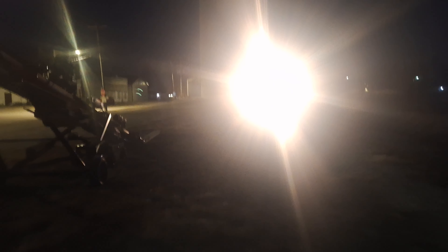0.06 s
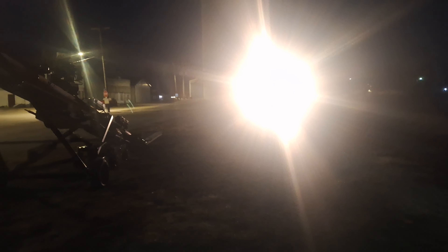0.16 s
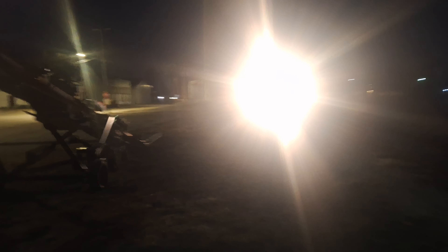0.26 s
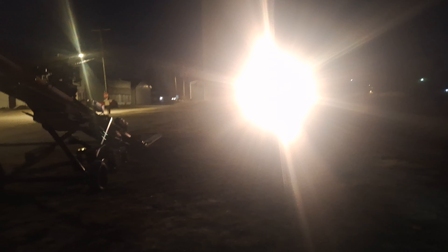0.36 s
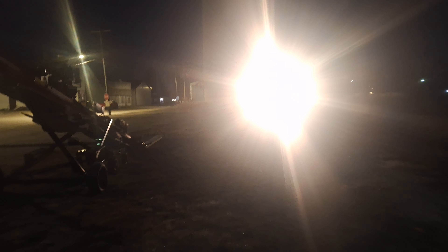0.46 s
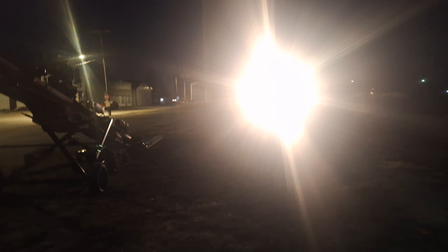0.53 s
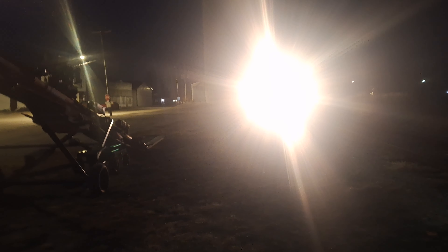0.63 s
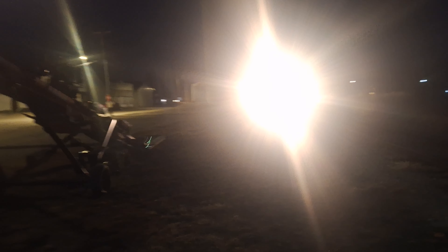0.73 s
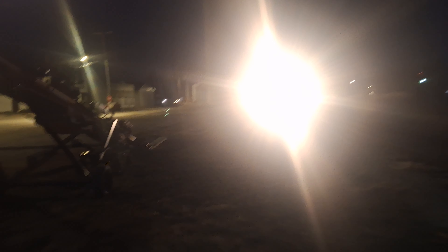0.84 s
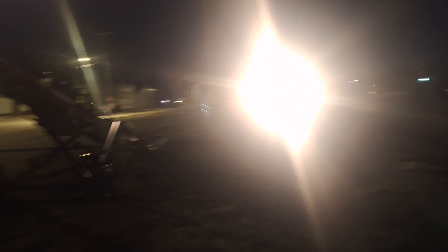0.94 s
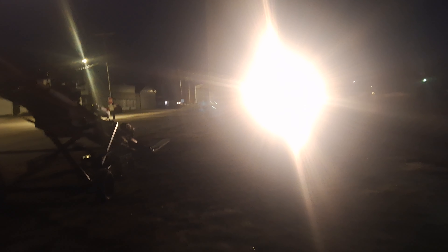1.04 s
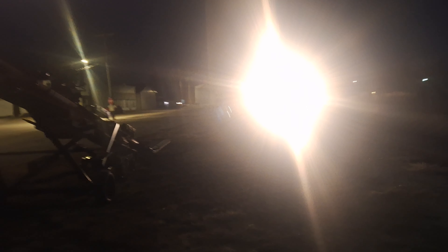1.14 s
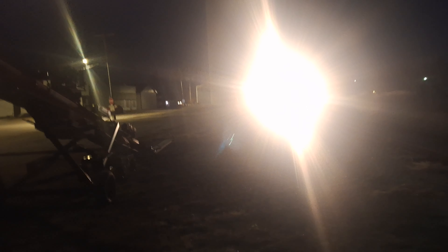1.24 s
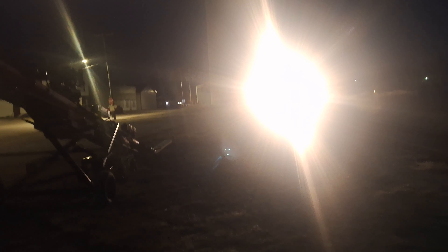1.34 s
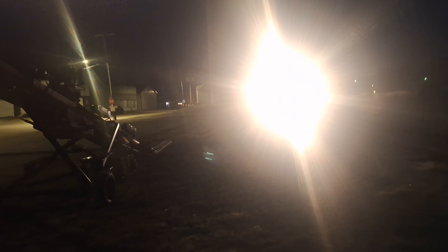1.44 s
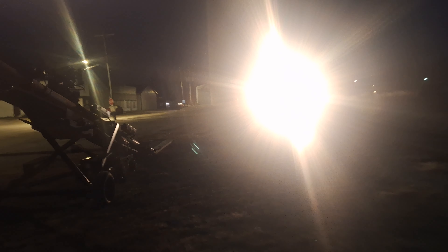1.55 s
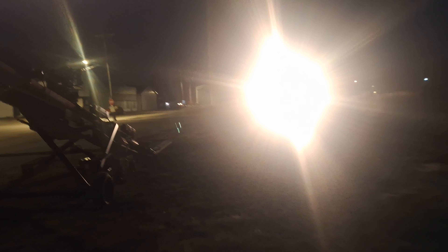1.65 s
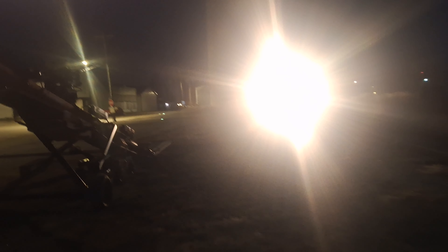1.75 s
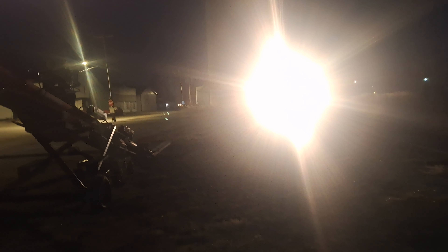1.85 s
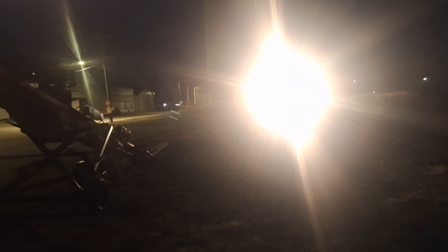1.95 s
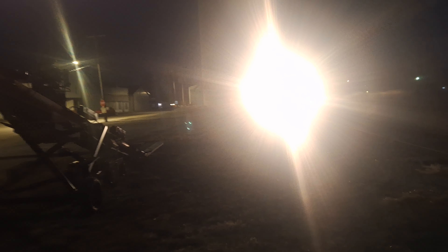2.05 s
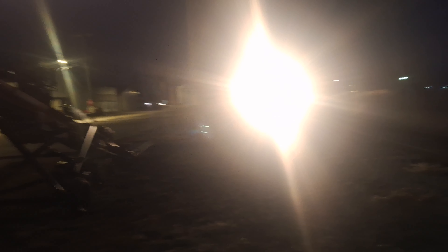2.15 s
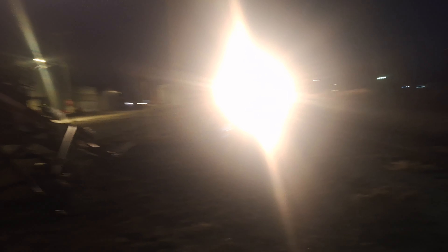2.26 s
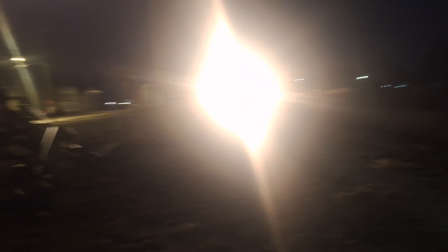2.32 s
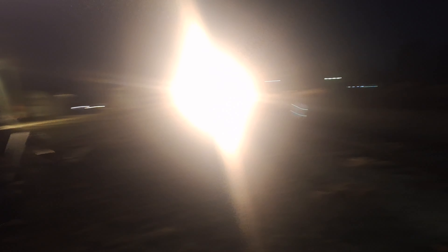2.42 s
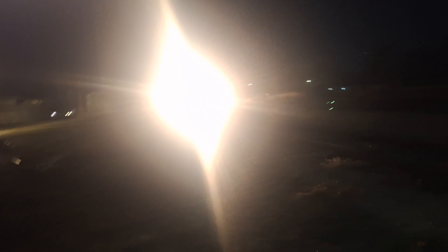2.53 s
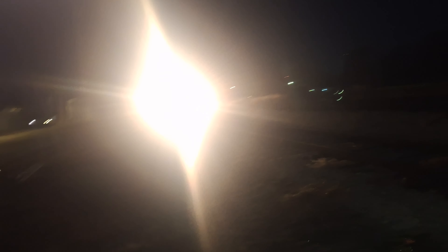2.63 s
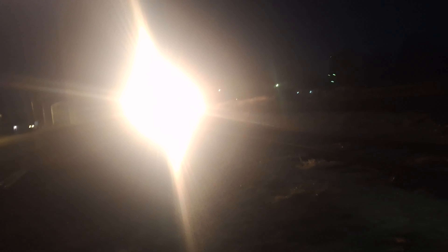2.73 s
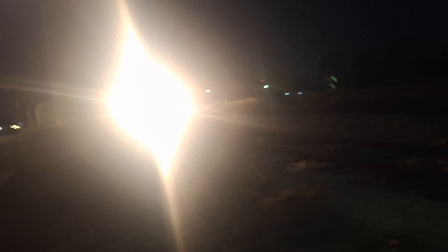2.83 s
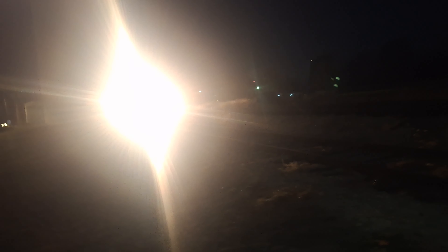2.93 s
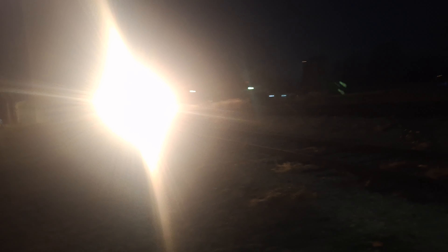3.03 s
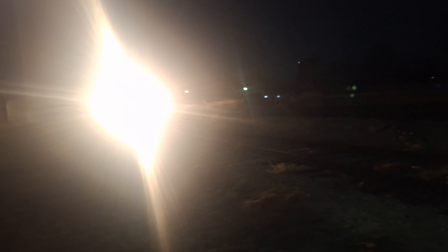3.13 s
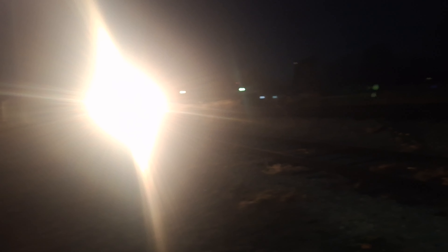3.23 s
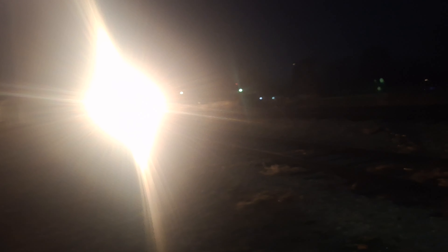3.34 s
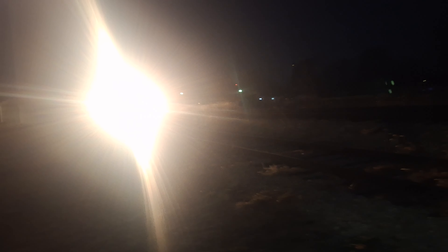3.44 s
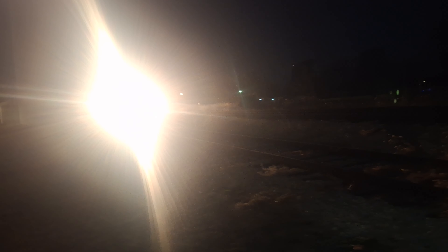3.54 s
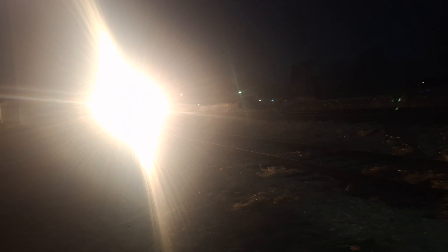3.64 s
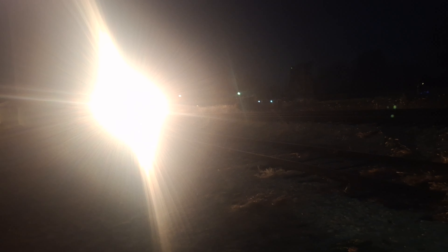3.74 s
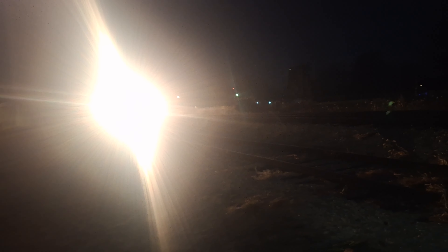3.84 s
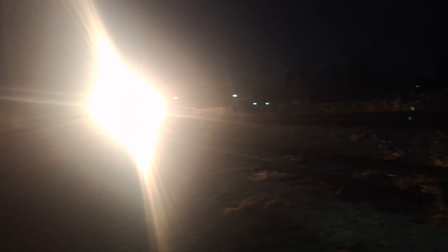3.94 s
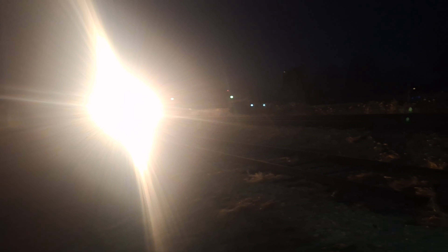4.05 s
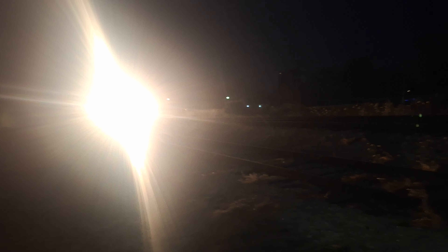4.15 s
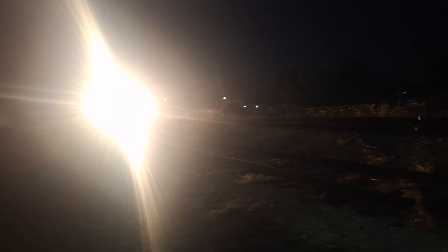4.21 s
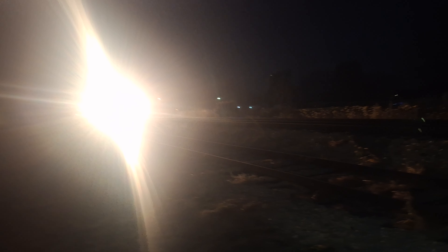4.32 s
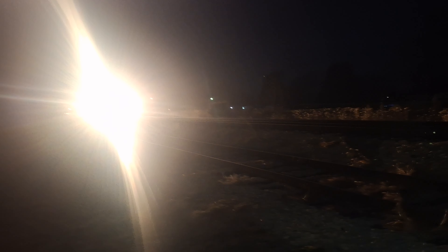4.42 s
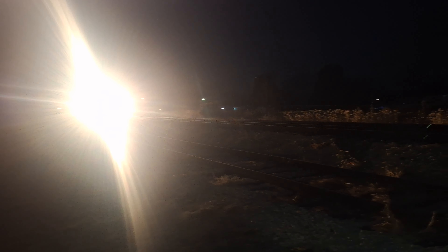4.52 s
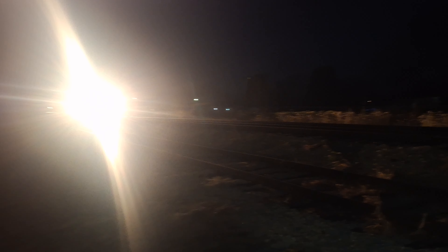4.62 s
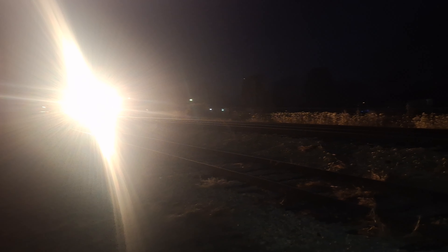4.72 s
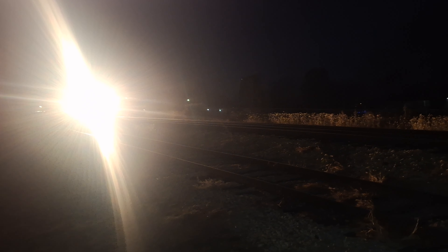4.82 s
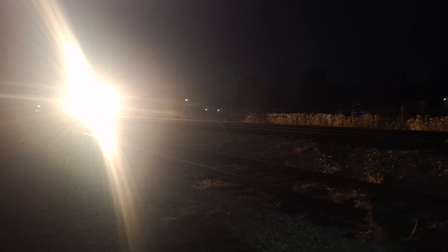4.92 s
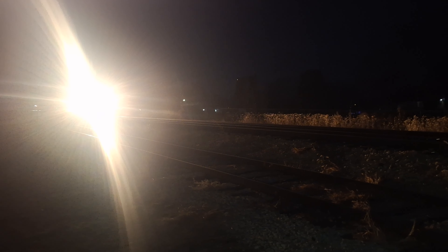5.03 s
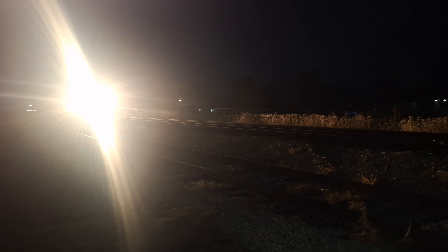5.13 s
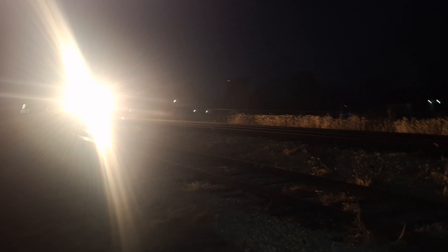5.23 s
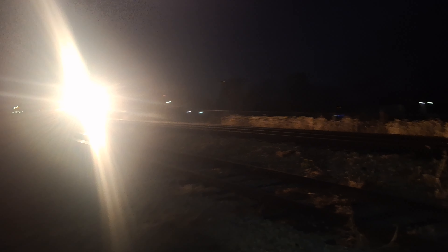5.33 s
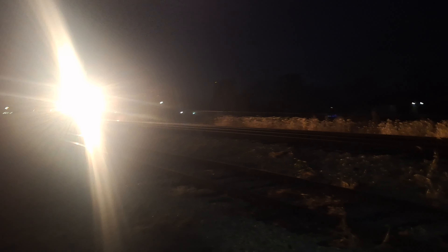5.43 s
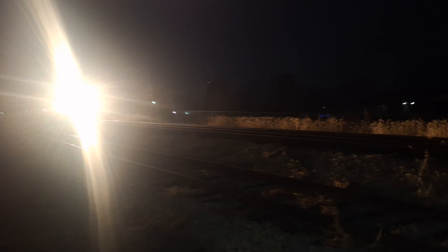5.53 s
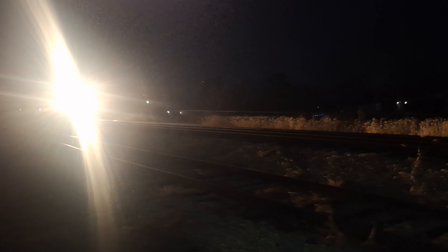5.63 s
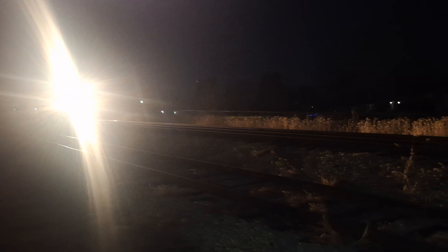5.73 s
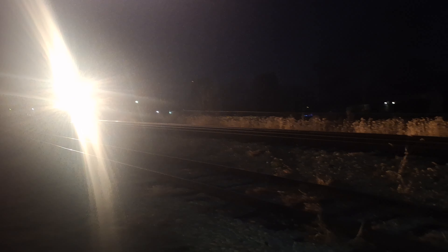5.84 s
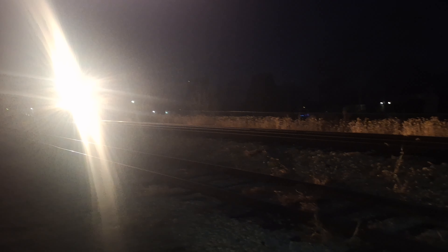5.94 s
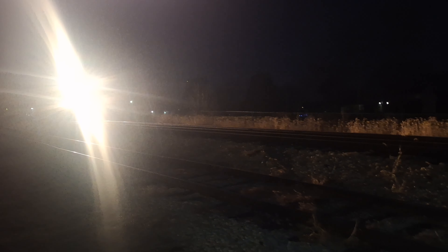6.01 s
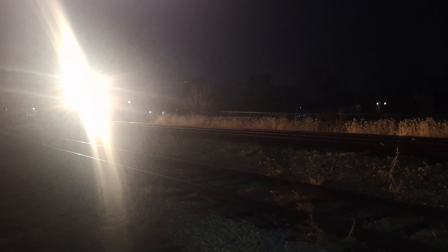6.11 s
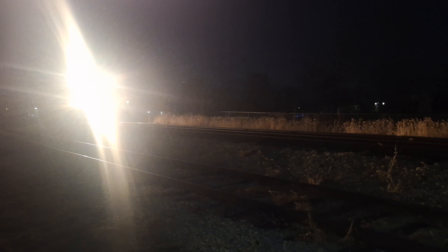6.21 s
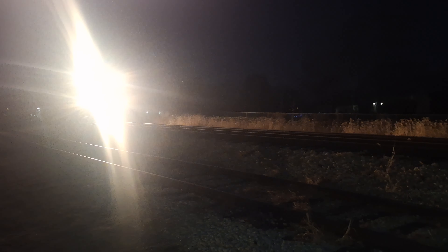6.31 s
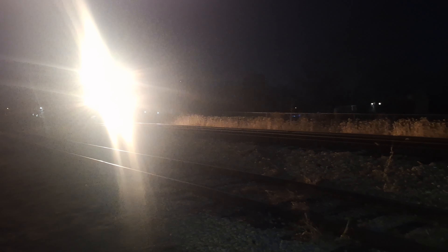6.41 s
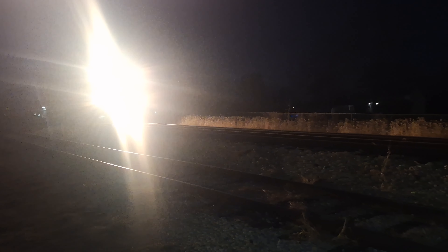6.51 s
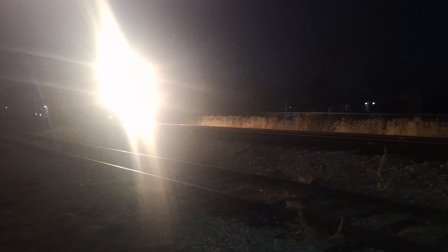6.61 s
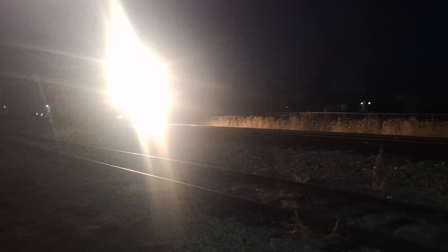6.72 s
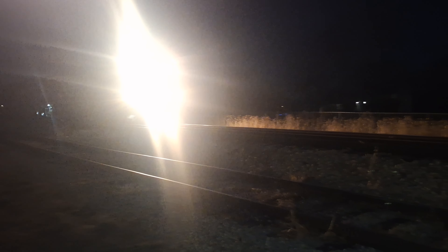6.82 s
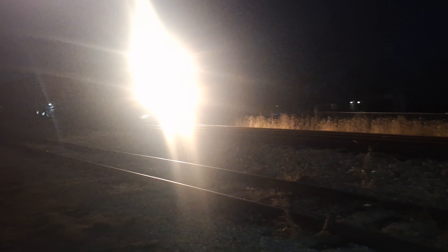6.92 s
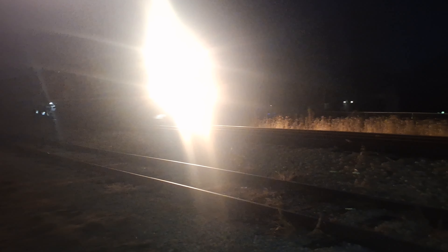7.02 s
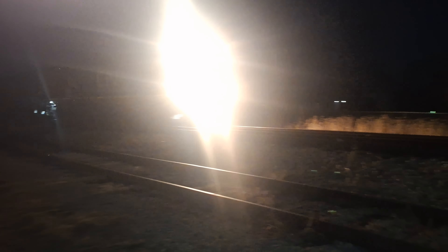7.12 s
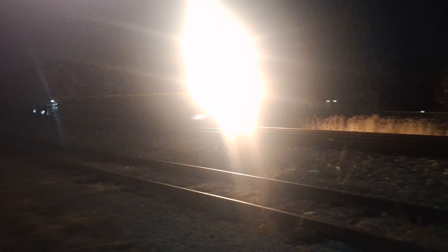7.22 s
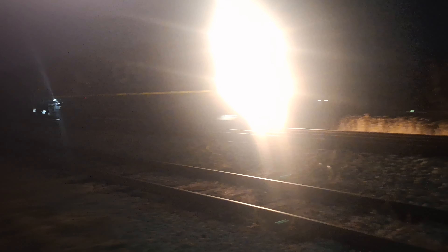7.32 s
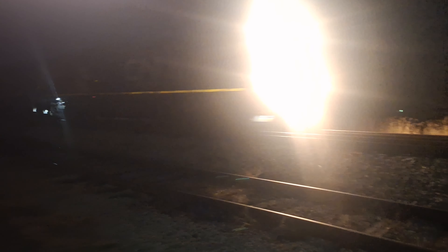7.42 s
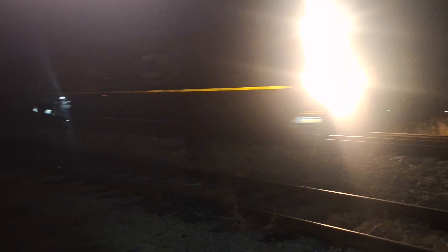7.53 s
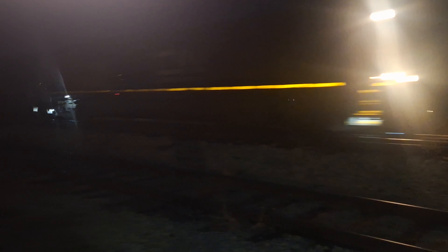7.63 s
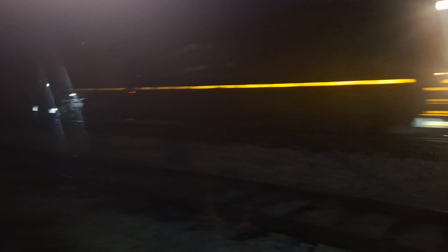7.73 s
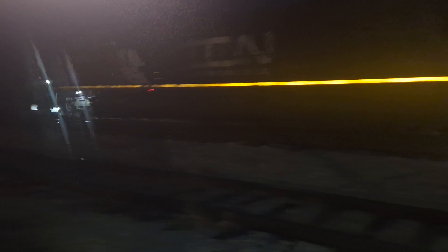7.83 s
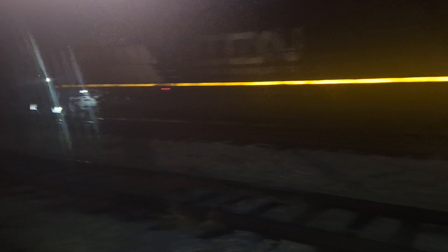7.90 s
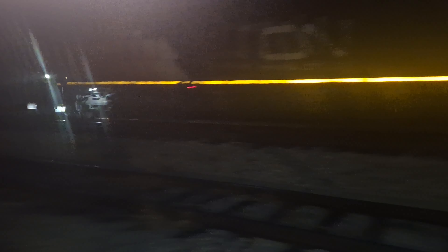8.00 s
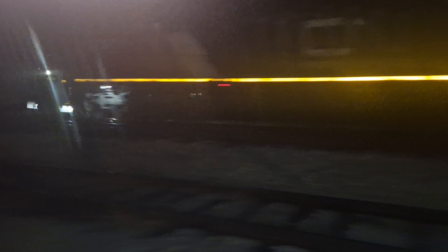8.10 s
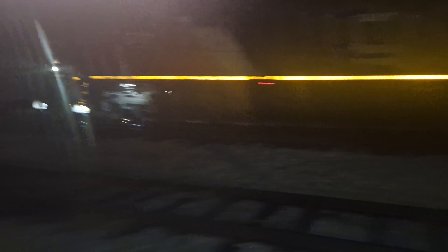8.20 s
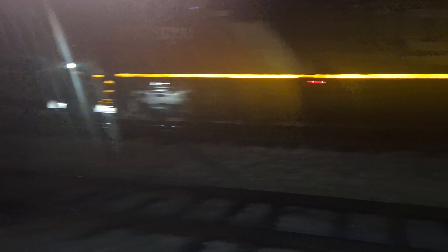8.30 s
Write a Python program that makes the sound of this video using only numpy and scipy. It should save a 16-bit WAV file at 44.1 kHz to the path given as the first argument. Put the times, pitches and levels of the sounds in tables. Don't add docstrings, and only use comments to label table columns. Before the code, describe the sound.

Outdoors at night beside a railway, a phone a few metres from the track hears a low, beating diesel drone over a fading yard hum. Gravel rustles and a sharp stone knock sound close by. The approaching train's exhaust roar and rolling steel swell steadily, with scratchy high fizz along the rails. Finally it draws level with thumps, brief whistles, thick wheel rush and a falling engine pitch.

```python
import sys
import numpy as np
from scipy import signal
from scipy.fft import rfft, irfft, next_fast_len
from scipy.io import wavfile
from scipy.ndimage import uniform_filter1d, map_coordinates

SR = 44100
rng = np.random.default_rng(int(sys.argv[2]) if len(sys.argv) > 2 else 0)


def wrap_up_sound(samples):
    columns = np.atleast_2d(samples).T
    tamed = np.clip(columns, -1, 1)
    steps = np.round(tamed * 32767).astype(np.int16)
    wavfile.write(sys.argv[1], SR, steps)


def volts(x):
    e = np.asarray(x, float) / 20
    return 10 ** e


N = 368676

# time in seconds, engine cycles in Hz.
LEAD_CYCLES = [(0.0, 6.83), (0.3, 6.673), (3.0, 6.657), (5.5, 6.662), (6.8, 6.633), (7.4, 6.627),
               (7.9, 6.481), (8.36, 6.254)]
REAR_CYCLES = [(0, 6.5), (3.5, 6.5), (5.5, 7), (6.5, 6.41), (8.36, 6.35)]
# time in seconds, level in dB.
FIRING_LEVEL = [(0, -23.5), (.25, -22.5), (.7, -20), (1.3, -18.5), (2.4, -19), (4, -17.5), (4.9, -17),
                (5.4, -18), (5.9, -14.5), (6.6, -14.5), (7.1, -16.5), (7.55, -12.5), (8.36, -14.5)]
REAR_LEVEL = [(0, -48), (2, -44), (3.5, -38), (5, -33), (6.5, -29), (7.3, -33), (8.36, -38)]
# time in seconds, share of the lead's
BEATS = [(-.1, 0.27), (.42, .22), (1.0, .4), (1.62, .1), (2.05, 0.045), (2.5, .25), (3.08, .22),
         (3.37, 0.14), (3.8, .5), (4.43, 0.33), (4.83, 0.47), (5.15, .3), (5.49, .2), (6.31, 0.66),
         (6.89, 0.33), (7.35, 0.46), (7.8, 0.044), (8.4, .1)]
# multiple of the engine cycle, level in dB.
LOW_ORDERS = [(10, -4.5), (11, -3), (12, -5.5), (13, -17)]
HIGH_ORDERS = [(14, -13), (15, 0), (16, -11.5), (17, -9), (19, -17), (20, -22), (23, -26), (25, -27),
               (26, -22)]
REAR_ORDERS = [(7.3, -12), (9, 0), (10, -8), (11, -6), (12, -11), (13, -12), (14, -14), (15, -8)]

# frequency in Hz, dB per Hz.
RUMBLE_COLOUR = [(25, -17), (40, -15), (48, -6), (60, -2), (100, -3), (130, -5.5), (165, -8), (200, -10),
                 (250, -18.5), (320, -26), (400, -34), (500, -120)]
ROAR_COLOURS = [
    [(190, -36.5), (330, -13), (454, -10.5), (493, -4), (641, 2), (679, 1), (812, 0), (1050, -7), (1360, -41.5), (2310, -120)],
    [(190, -35.5), (330, -12), (355, -11.5), (481, -2), (616, 1.5), (760, 0), (944, -13), (1050, -13), (1360, -32.5), (2310, -120)],
]
WHEEL_COLOURS = [
    [(560, -31.5), (950, -8), (1200, 5.5), (1650, 1), (2030, 3), (2200, -1.5), (2470, 1), (2920, -6.5), (3380, -11), (3630, -19), (3940, -27), (4300, -30.5), (5590, -46.5), (9460, -120)],
    [(560, -28), (950, -4.5), (1050, -2.5), (1240, 1.5), (1630, -2.5), (2040, -0.5), (2250, -1.5), (2610, -4), (2890, -7), (3890, -13), (4290, -16.5), (5600, -24), (7280, -51), (12300, -120)],
]
HISS_COLOUR = [(1760, -34.5), (3000, -4.5), (3930, -4.5), (4350, -5.5), (5280, -7), (6020, -10.5),
               (7560, -8.5), (9560, -15), (13800, -16.5), (15600, -21.5)]
FIZZ_COLOUR = [(7240, -51), (12300, -14.5), (13400, -1), (14100, 2.5), (15000, 3.5), (15500, 2.5),
               (15800, -5)]
SKIRT_COLOUR = [(5590, -50), (9500, -23), (10800, -20), (11500, -3), (11900, -1.5), (13000, -10.5)]
# time in seconds, exhaust share 0-1, wheel share 0-1.
NEARNESS = [(0, 0.26, 0), (1, 0.1095, 0.04), (3.5, 0.023, 0.18), (4.5, 0.29, 0.73), (5.5, 0.64, 0.99),
            (6.4, 0.8633, 0.9175), (7.2, 1, 0.88), (8.36, 1, 0.6)]
# frequency in Hz, width in Hz, level in dB under the roll, hiss or fizz.
WHEEL_MODES = [(1254, 22, -12.5), (1979, 21, -14.5), (2520, 39, -16), (3160, 34, -20.5), (3486, 26, -23),
               (3776.9, 18, -22.5), (3925, 29, -23.5), (4120, 36, -24.5)]
HISS_MODES = [(4615, 33, -18), (5550.8, 20, -20), (7027, 24, -17.5), (7540, 30, -21.5), (8300, 20, -22.5)]
RAIL_MODES = [(12246, 40, -25.5), (12580, 40, -26.5), (12940, 40, -21), (13100, 30, -18), (13805, 40, -16),
              (14155, 30, -11.5), (14520, 30, -11.5), (15030, 30, -10), (15330, 40, -15), (15590, 40, -14)]

# level abreast in dB, time abreast in seconds, seconds to cover the gap
# to the track, growth exponent, shading in dB per second once past.
SEVENTH_PASS = (-31, 5, 1.1, 2.3, 7.5)
NINTH_PASS = (-20, 8, 0.2, 0.6, 3.5)
LOW_PASS_BY = (-26, 7.5, 2.5, 0.52, 6)
HIGH_PASS_BY = (-26, 7.5, 1.42, 0.85, 12)
RUMBLE_PASS = (-33.5, 7.5, 2.6, 1.19, 1)
ROAR_PASS = (-33, 7.5, 0.6139, 1.0055, -1.2)
WHEEL_PASS = (-37, 8, .5, 0.7506, 1)
HISS_PASS = (-51.5, 8.5, 1.44, 2.5, -4.5)
# starting level in dB, fade in dB per second.
YARD_TONE = (-34.5, 8.2)
YARD_RUMBLE = (-45.5, 3.5)
YARD_ROAR = (-47, 4)
YARD_WHEEL = (-59, 13)
YARD_HISS = (-72, 30)

# time in seconds, swell in dB.
JOINTS = [(0.111, 0), (1.63, 5), (4.8, 1.5), (6.29, 5.5), (7.4, 5.5), (7.5, 4.5), (7.61, 0), (7.82, -2.5),
          (7.96, 0), (8.35, 4.5)]
# crest in seconds, level in dB, seconds to rise 12 dB, seconds to fall 12 dB.
RUBS = [(0.08, -45.0, 0.14, 0.19), (0.51, -56.5, 0.12, 0.06), (0.63, -51.0, 0.02, 0.06),
        (0.71, -46.5, 0.03, 0.06), (0.85, -53.0, 0.13, 0.03), (1.03, -46.5, 0.08, 0.05),
        (1.24, -47.5, 0.03, 0.22), (1.44, -53.0, 0.2, 0.06), (1.53, -49.5, 0.08, 0.18),
        (1.83, -51.5, 0.14, 0.04), (1.95, -53.0, 0.04, 0.03), (2.0, -51.5, 0.02, 0.35),
        (2.06, -50.0, 0.02, 0.15), (2.28, -49.5, 0.03, 0.06), (2.48, -52.5, 0.02, 0.1),
        (2.64, -45.0, 0.06, 0.07), (2.8, -51.0, 0.11, 0.03), (2.88, -50.0, 0.06, 0.24),
        (3.07, -50.5, 0.03, 0.07), (3.36, -47.5, 0.02, 0.21), (3.58, -52.5, 0.17, 0.13),
        (3.73, -45.0, 0.02, 0.2), (3.79, -43.5, 0.04, 0.07), (4.05, -49.5, 0.07, 0.03),
        (4.22, -50.0, 0.13, 0.14), (4.44, -53.0, 0.02, 0.03), (4.61, -51.0, 0.07, 0.5),
        (4.83, -45.0, 0.19, 0.08), (5.17, -46.5, 0.05, 0.05), (5.25, -52.5, 0.07, 0.07),
        (5.48, -43.5, 0.03, 0.23), (5.59, -42.5, 0.12, 0.06), (5.75, -41.5, 0.02, 0.11),
        (5.92, -49.5, 0.14, 0.03), (5.96, -49.0, 0.02, 0.13), (6.28, -54.5, 0.11, 0.19),
        (6.45, -49.5, 0.02, 0.07), (6.58, -52.5, 0.03, 0.17), (6.78, -50.0, 0.1, 0.05),
        (6.88, -50.5, 0.03, 0.11), (7.05, -52.5, 0.03, 0.06), (7.22, -45.0, 0.06, 0.05),
        (7.36, -51.5, 0.4, 0.22), (7.62, -47.5, 0.05, 0.3), (7.85, -50.5, 0.13, 0.33),
        (7.98, -53.5, 0.02, 0.12), (8.13, -57.5, 0.02, 0.03), (8.28, -47.5, 0.11, 0.5)]
# start in seconds, length in seconds, frequency in Hz, level in dB.
WHISTLES = [(3.45, .3, 14550, -64.5), (3.851, 0.13, 14550, -67.5), (4.207, 0.13, 14240, -70),
            (5.0, .12, 14460, -70), (5.07, 0.042, 7010, -73), (5.1, .12, 3740, -66), (5.3, 0.11, 3780, -63),
            (5.36, 0.22, 3610, -64.5), (5.3, .1, 3270, -63), (5.4, .14, 2490, -62), (5.57, .07, 3920, -64),
            (5.55, .07, 15200, -57), (5.81, .12, 14170, -60.5), (5.97, .1, 3880, -62),
            (6.04, .16, 3890, -65), (6.62, .14, 3770, -64), (6.27, .04, 3950, -62), (2.51, .04, 3550, -75),
            (2.59, .04, 3520, -75), (6.3, 0.064, 5780, -69), (6.53, .08, 3770, -63), (5.79, .08, 3150, -65),
            (7.76, .12, 7350, -62), (7.74, .03, 4700, -56), (8.1, .05, 2700, -50), (7.366, .05, 1292, -49),
            (7.589, 0.071, 1281, -47.5), (7.82, 0.05, 4170, -53), (7.87, 0.065, 3440, -55.5),
            (7.928, 0.11, 1235, -47), (8.27, .05, 4450, -55)]
# start in seconds, length in seconds,
# level in dB, low edge in Hz, high edge in Hz.
RUSTLES = [(-.1, .28, -64.5, 3000, 14700), (0, 1.2, -57.5, 1700, 2200), (.05, 1.1, -62.5, 2300, 2700),
           (1.59, .2, -65.5, 3000, 3700), (1.936, .75, -66, 3010, 14430), (2.11, .13, -47.5, 228, 446),
           (2.25, .2, -53, 620, 900), (2.115, .2, -60.5, 2750, 14870), (2.14, .2, -67, 2700, 5200),
           (2.47, .35, -67, 3000, 3750), (4.3, 1.0, -63, 2500, 4800), (4.95, 1.5, -52, 900, 4400),
           (5.4, 2.4, -50, 830, 1500), (0, 1.2, -57, 1000, 1550), (.15, .55, -50.5, 550, 800),
           (.07, .08, -52, 800, 1500), (5.238, .03, -54, 2900, 5000), (5.24, .03, -50, 2200, 3030),
           (5.262, .05, -53.5, 2900, 4300), (5.262, .055, -47, 1800, 2900),
           (6.269, .083, -52.5, 1000, 6000), (7.1, .55, -48, 1900, 3700), (7.945, .072, -50.5, 2500, 11200),
           (8.266, .12, -44, 3200, 15500), (7.93, .5, -40, 560, 800), (7.42, .13, -36, 520, 800),
           (7.58, .12, -38, 550, 800), (5.5, .8, -60, 3000, 4200), (.37, .06, -72, 8000, 13000),
           (7.3, .9, -58, 4500, 11000), (7.24, .14, -56, 4500, 9000), (7.62, .08, -56, 4500, 10000)]
# start in seconds, peak in dB, frequency in Hz, 60 dB decay in seconds.
TICKS = [(.082, -32, 480, .03), (.113, -23, 900, .012), (.4174, -39, 3900, .004), (.4176, -38, 1700, .008),
         (1.072, -27, 750, .014), (1.285, -52, 8000, .004), (1.33, -33, 900, .01), (1.5903, -13, 950, .004),
         (2.118, -31, 450, .025), (2.148, -28, 330, .035), (5.2427, -44, 2670, .12),
         (5.244, -47, 4100, .05), (5.283, -45, 3400, .06), (5.3226, -42, 2350, .04), (7.81, -14, 710, .04)]

# frequency in Hz, likeness 0-1.
PORT_LIKENESS = [(60, 0.95), (150, 1), (300, 0.94), (650, 0.83), (1300, 0.26), (2500, 0.18), (5000, 0.11),
                 (10000, 0.18), (14000, .68)]
# frequency in Hz, left's lead in radians.
PORT_LEAD = [(25, -0.6), (60, -.5), (130, -0.16), (300, 0.32), (650, -0.087), (1250, 0.24), (2300, -0.41),
             (16000, -0.46)]
# frequency in Hz, left minus right in dB.
PORT_TILT = [(60, 2.5), (110, 1.5), (200, -0.5), (380, -0.5), (700, -1.0), (1290, 2.5), (2380, 6),
             (4400, -2.5), (8120, -2), (15000, -9.5)]
# frequency in Hz, level in dB.
RAIL_SHADE = [(9000, -0.5), (11000, -8), (12700, -12.5), (13400, -7), (14400, -2.5), (15000, 0.5),
              (15600, 5.5)]
# time in seconds, left's lead in milliseconds.
BEARING = [(0, 0), (1, 0.088), (2, .16), (2.7, .29), (5, .33), (5.6, .36), (5.95, .52), (6.25, .52),
           (6.6, .33), (7.2, .22), (7.7, .03), (8.36, -.28)]


def engines():
    lead = np.cumsum(curves(LEAD_CYCLES)[0]) / SR - .3635
    rear = np.cumsum(curves(REAR_CYCLES)[0]) / SR + 0.2946
    bend = .122

    slipped, share = curves([(s, k, part) for k, (s, part) in enumerate(BEATS)])
    bank = orders([(8, 0)], lead, bend=.17, unsteady_db=0)
    slower = orders([(8, 0)], lead - slipped / 8, bend=.17, unsteady_db=0)
    tones = volts(curves(FIRING_LEVEL)[0]) * (bank - share * slower)

    ninth_db = passing(*NINTH_PASS, (-31.5, .3))
    tones += volts(ninth_db) * orders([(9, 0)], lead, bend, unsteady_db=1.5)
    tones += volts(passing(*SEVENTH_PASS)) * orders([(7, 0)], lead, bend, unsteady_db=.7)
    tones += volts(passing(*LOW_PASS_BY)) * orders(LOW_ORDERS, lead, bend, unsteady_db=1.5)
    tones += volts(passing(*HIGH_PASS_BY)) * orders(HIGH_ORDERS, lead, bend, unsteady_db=2)
    tones += volts(curves(REAR_LEVEL)[0]) * orders(REAR_ORDERS, rear, bend=.03, unsteady_db=2.5)

    rumble_db = passing(*RUMBLE_PASS, YARD_RUMBLE) + 5.5
    roar_db = passing(*ROAR_PASS, YARD_ROAR) + 0.4 * joints()
    puffs = volts(.5 * np.cos(2 * np.pi * 8 * lead))
    roar = nearing(ROAR_COLOURS, curves(NEARNESS)[0], patchy_db=1.0, spiky_db=0.8)
    noise = volts(rumble_db) * rush(RUMBLE_COLOUR, patchy_db=0.72) + volts(roar_db) * puffs * roar
    return noise + direct(tones)


def orders(table, turns, bend, unsteady_db):
    total = 0
    for k, db in table:
        phase = k * turns + bend * (k - 8) ** 2
        total = total + volts(db + 3 + unsteady_db * wobble(1.201)) * np.cos(2 * np.pi * phase)
    return total


def wheels():
    wheel_db = passing(*WHEEL_PASS, YARD_WHEEL) + joints()
    hiss_db = passing(*HISS_PASS, YARD_HISS) + .5 * joints() + 5.0
    share = curves(NEARNESS)[1]
    close = share.clip(0, 1)

    roll = volts(0.15 * wobble(9)) * nearing(WHEEL_COLOURS, share, patchy_db=1.0, spiky_db=1.5)
    roll += volts(15 * (close - 1) + 2.5) * rings(WHEEL_MODES, rate=6, gate_db=3)
    hiss = volts(1.3 * wobble(6.2)) * rush(HISS_COLOUR, patchy_db=0.1009, spiky_db=1.5)
    hiss += close * rings(HISS_MODES, rate=10, gate_db=4.5)
    return volts(wheel_db) * roll + volts(hiss_db) * hiss


def joints():
    return sum(db * np.exp(-crest(s, rise=0.017, fall=0.031)) for s, db in JOINTS)


def flanges():
    rubs_db = [db - 12 * np.hypot(crest(s, rise, fall), .1) for s, db, rise, fall in RUBS]
    fizz_db = summed(-66.5, *rubs_db)
    skirt_db = -86.5 + 3.5 * np.arange(N) / SR + .75 * (fizz_db - fizz_db.mean())

    stutter = volts(.5 * wobble(45) + 1.3 * wobble(160))
    grit = rush(FIZZ_COLOUR, patchy_db=1.0, spiky_db=1.5) + .7 * rings(RAIL_MODES, rate=12, gate_db=3.5)
    fizz = volts(fizz_db - .5) * unit(stutter * grit)
    fizz += volts(skirt_db) * unit(stutter * rush(SKIRT_COLOUR, patchy_db=1.5, spiky_db=1.5))

    for s, length, hz, db in WHISTLES:
        t = np.arange(int(length * SR)) / SR
        drift = np.cumsum(rng.standard_normal(SR // 2))[:len(t)] * .055
        swell = np.sin(np.pi * t / length) ** 1.2
        fizz[0, int(s * SR):][:len(t)] += volts(db + 11) * swell * np.sin(2 * np.pi * hz * t + drift)
    return fizz


def rustles_and_ticks():
    t, out = np.arange(N) / SR, np.zeros((2, N))
    grit = rng.standard_normal((2, N)) * volts(1.3 * rng.exponential(size=N))
    for s, length, db, lo_hz, hi_hz in RUSTLES:
        band = filtered(grit, lambda f: 1 / (1 + (lo_hz / (f + 1)) ** 18) / (1 + (f / hi_hz) ** 18))
        swell = np.sin(np.pi * np.clip((t - s) / length, 0, 1) ** 0.61) ** 1.9
        out += volts(db) * swell * unit(band)

    u = t[:SR // 20]
    for s, db, hz, t60 in TICKS:
        onset = 1 - np.exp(-(u * hz / 1.2) ** 2)
        out[0, int(s * SR):][:len(u)] += volts(db - 60 * u / t60) * onset * np.sin(2 * np.pi * hz * u)
    return out


def yard_drone():
    level_db = passing(-50.5, 0, 1, 0, 0, YARD_TONE)
    return direct(volts(level_db) * orders([(1, 0)], 126.6 * np.arange(N) / SR, bend=0, unsteady_db=1.5))


def ports(pair):
    turn = lambda hz: np.arccos(np.clip(along(PORT_LIKENESS, hz), 0, 1)) / 2
    mid, side = filtered(pair, lambda hz: np.array([np.cos(turn(hz)), np.sin(turn(hz))]))
    half = np.array([[.5], [-.5]])
    case = lambda hz: volts(half * along(PORT_TILT, hz)) * np.exp(1j * half * along(PORT_LEAD, hz))
    both = filtered(np.array([mid + side, mid - side]), case)

    hz, s, z = signal.stft(both, SR, nperseg=1024)
    early = np.interp(s, *np.transpose(BEARING)) / 1000
    shift = np.exp(2j * np.pi * half[..., None] * hz[:, None] * early)
    return signal.istft(z * shift, SR, nperseg=1024)[1][:, :N]


def passing(db, abreast, gap, growth, shading_db, yard=None):
    t = np.arange(N) / SR
    distance_db = growth * 10 * np.log10(1 + ((t - abreast) / gap) ** 2)
    level = db - distance_db - shading_db * (t - abreast).clip(0)
    return level if yard is None else summed(level, yard[0] - yard[1] * t)


def nearing(spectra, share, patchy_db, spiky_db):
    far, close = [rush(spectrum, patchy_db, spiky_db) for spectrum in spectra]
    share = share.clip(0, 1)
    return np.sqrt(1 - share) * far + np.sqrt(share) * close


def rings(modes, rate, gate_db):
    total = 0
    for hz, width, db in modes:
        ring = filtered(rng.standard_normal((2, N)), lambda f: 1 / (1 + ((f - hz) / width) ** 2))
        total = total + volts(db) * unit(ring * volts(gate_db * wobble(rate)))
    return total


def rush(spectrum, patchy_db, spiky_db=0):
    seed = rng.standard_normal((2, N)) * volts(spiky_db * rng.exponential(size=N))
    z = signal.stft(seed, nperseg=512)[2]
    field = uniform_filter1d(rng.standard_normal(z.shape[1:]), size=4, axis=0)
    field = uniform_filter1d(field, size=10, axis=1)
    pair = signal.istft(z * volts(patchy_db * unit(field)), nperseg=512)[1][:, :N]
    return unit(filtered(pair, lambda hz: volts(along(spectrum, hz))))


def direct(x):
    return np.array([x, 0 * x])


def crest(s, rise, fall):
    away = np.arange(N) / SR - s
    return np.where(away < 0, -away / rise, away / fall)


def summed(*levels_db):
    return 10 * np.log10(sum(volts(2 * db) for db in levels_db))


def unit(x):
    return x / np.sqrt(np.mean(x ** 2) + 1e-20)


def along(points, hz):
    f, v = np.transpose(points)
    return np.interp(np.log(hz + 1), np.log(f + 1), v)


def curves(rows):
    s, *cols = np.transpose(rows)
    return [np.interp(np.arange(N) / SR, s, c) for c in cols]


def wobble(rate):
    return map_coordinates(rng.standard_normal(int(N * rate / SR) + 4), [np.arange(N) * rate / SR])


def filtered(x, response):
    m = next_fast_len(N + 8192)
    return irfft(rfft(x, m) * response(np.fft.rfftfreq(m, 1 / SR)), m)[..., :N]


def scene():
    left_only = np.array([[1], [0]])
    rails = filtered(ports(flanges()), lambda hz: volts(left_only * along(RAIL_SHADE, hz)))
    return ports(engines() + wheels() + rustles_and_ticks() + yard_drone()) + rails


def low_pass(x):
    return signal.sosfilt(signal.butter(12, 16690, fs=SR, output="sos"), x)


def record(dry):
    rounded = dry / (1 + np.abs(dry / 1.15) ** 5) ** (1 / 5)
    mix = filtered(rounded, lambda hz: hz < 15820)
    return low_pass(mix)


dry = scene()
out = record(dry)
wrap_up_sound(out)
```